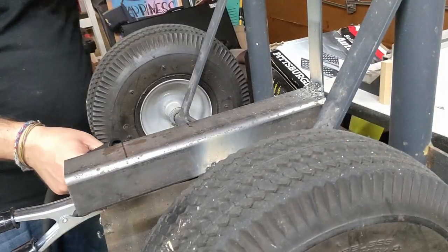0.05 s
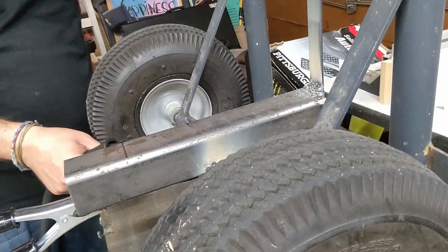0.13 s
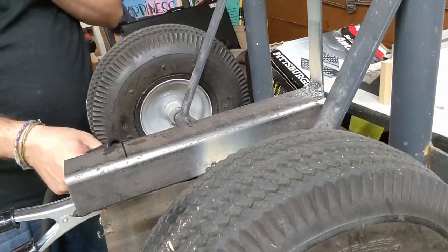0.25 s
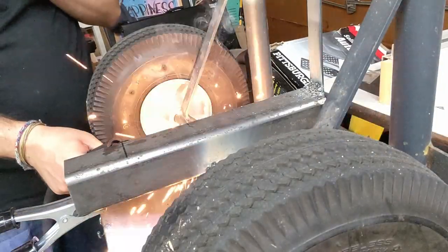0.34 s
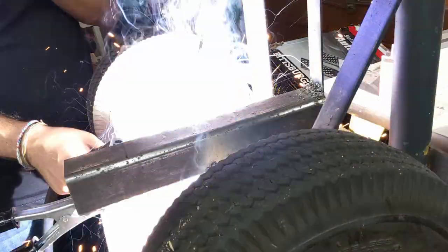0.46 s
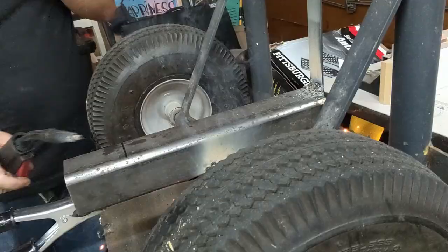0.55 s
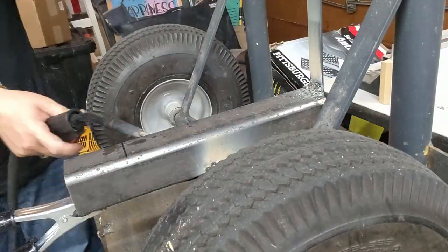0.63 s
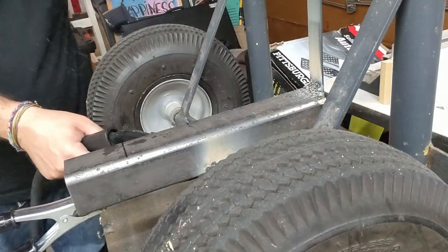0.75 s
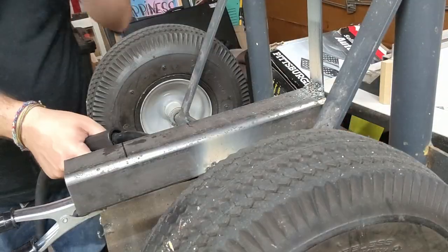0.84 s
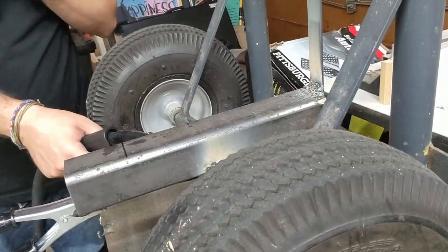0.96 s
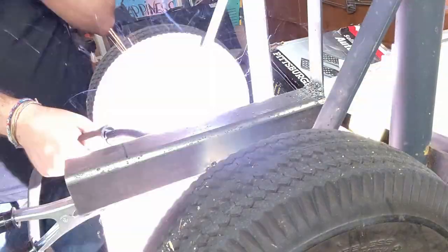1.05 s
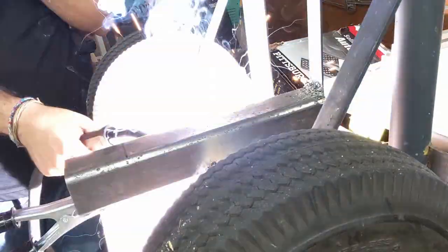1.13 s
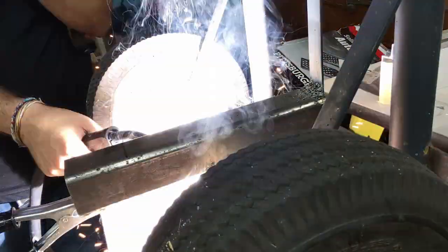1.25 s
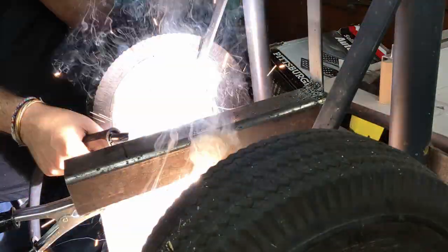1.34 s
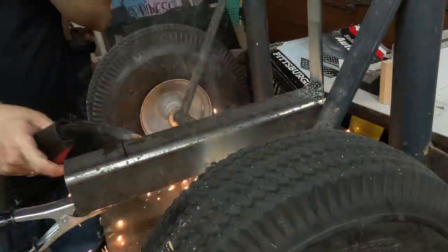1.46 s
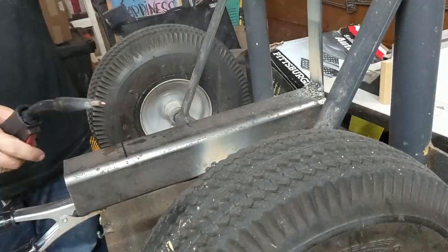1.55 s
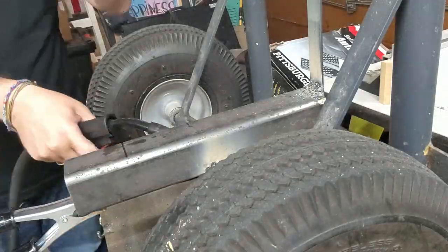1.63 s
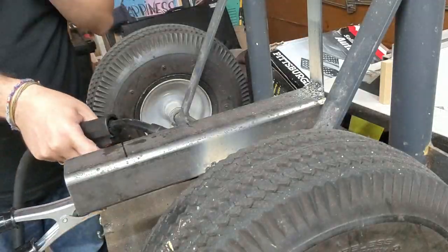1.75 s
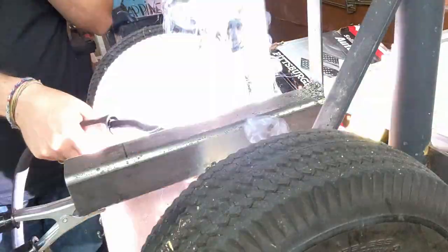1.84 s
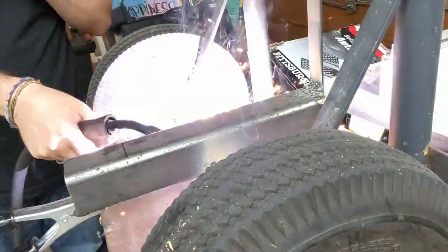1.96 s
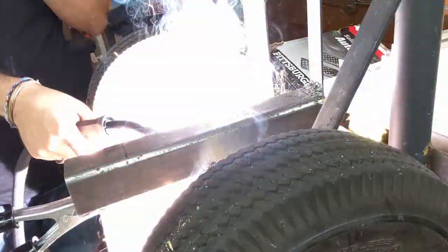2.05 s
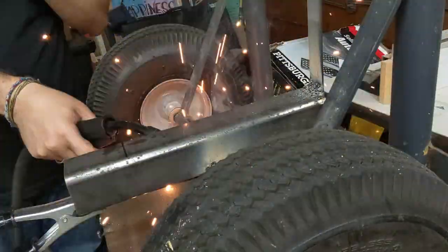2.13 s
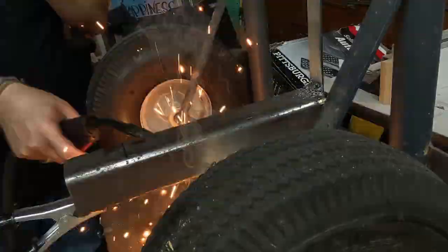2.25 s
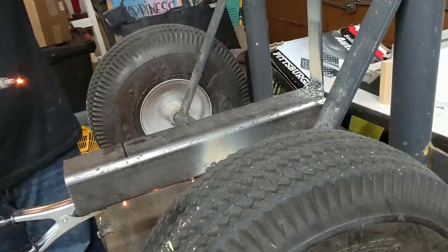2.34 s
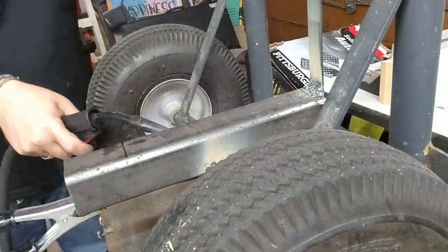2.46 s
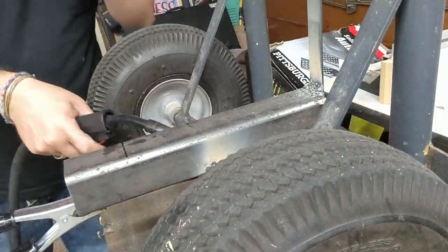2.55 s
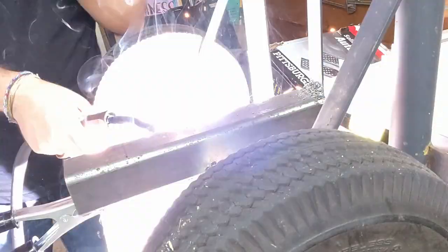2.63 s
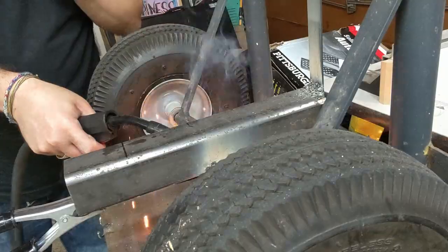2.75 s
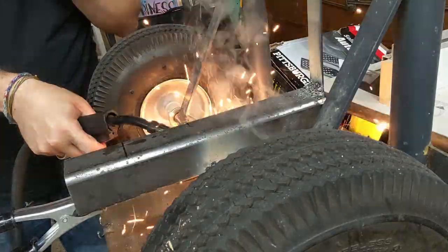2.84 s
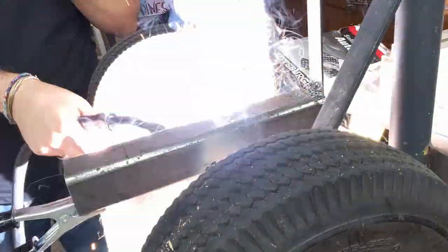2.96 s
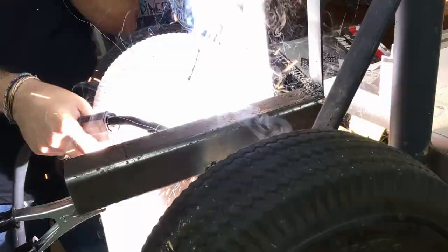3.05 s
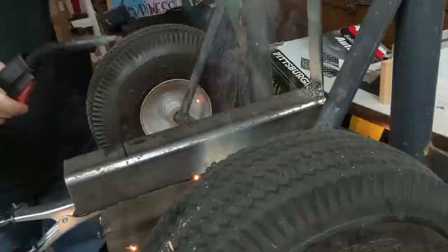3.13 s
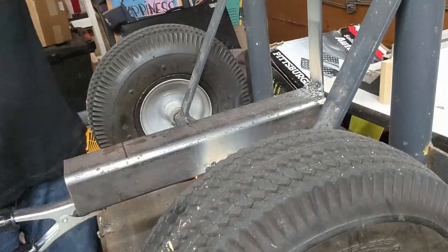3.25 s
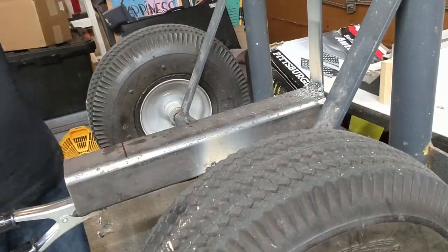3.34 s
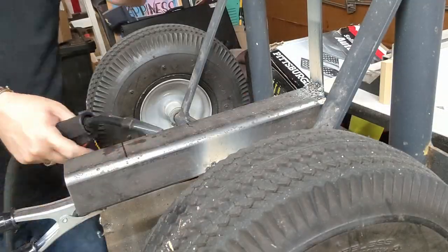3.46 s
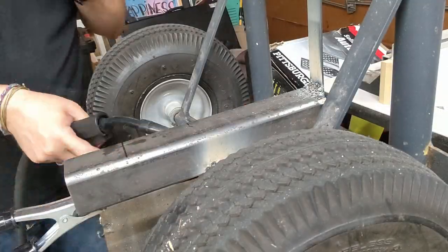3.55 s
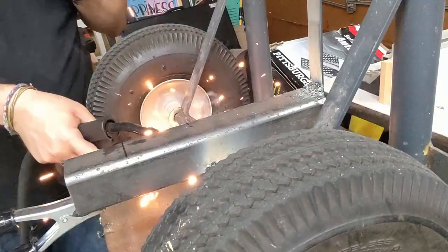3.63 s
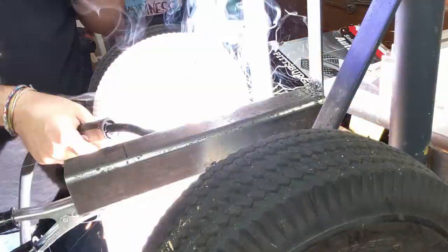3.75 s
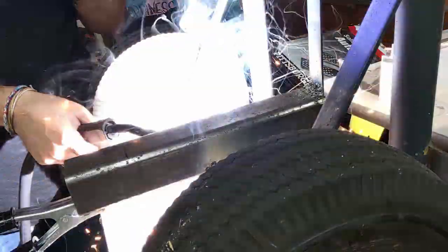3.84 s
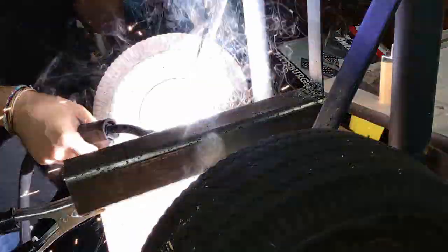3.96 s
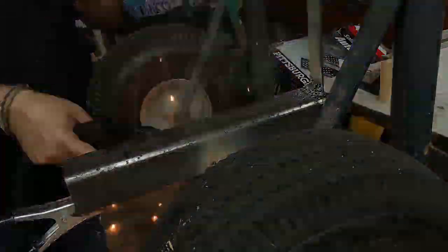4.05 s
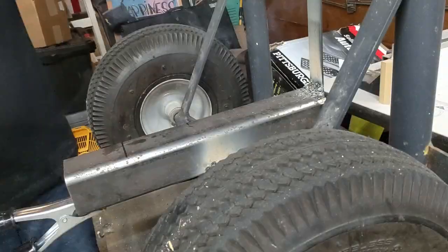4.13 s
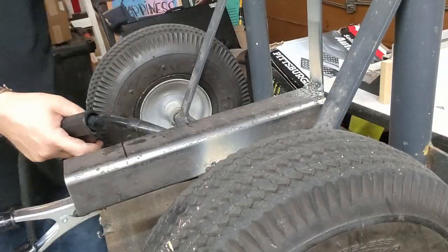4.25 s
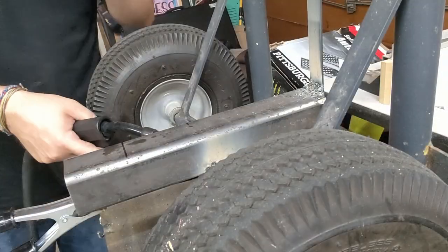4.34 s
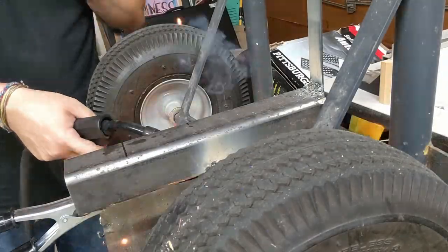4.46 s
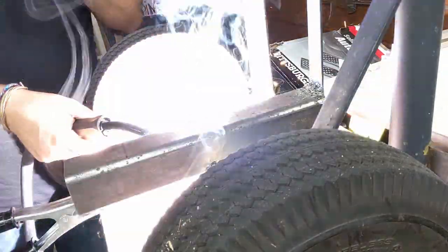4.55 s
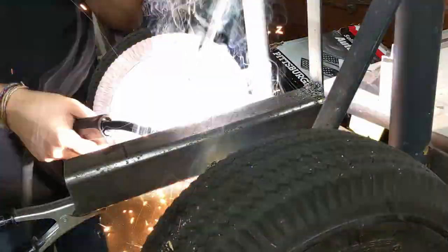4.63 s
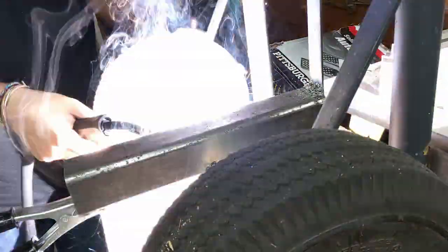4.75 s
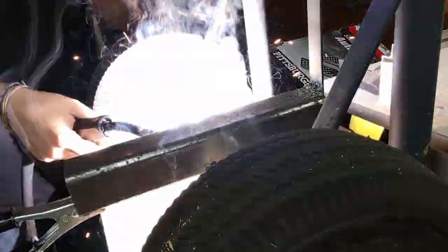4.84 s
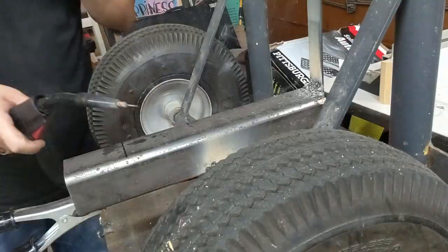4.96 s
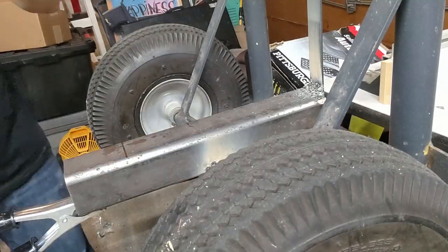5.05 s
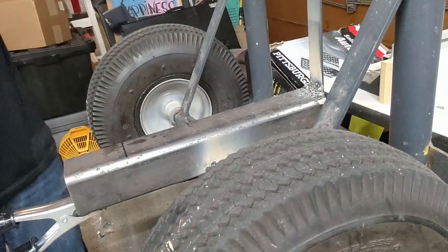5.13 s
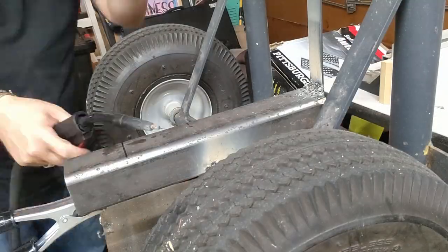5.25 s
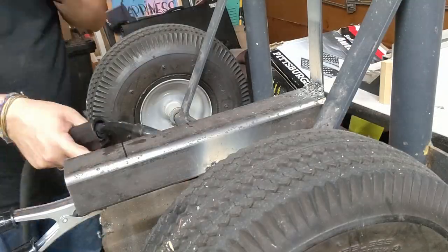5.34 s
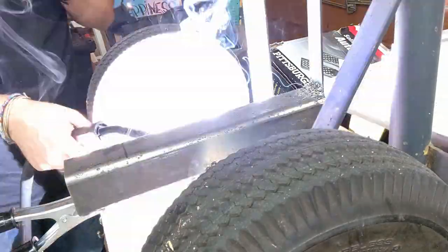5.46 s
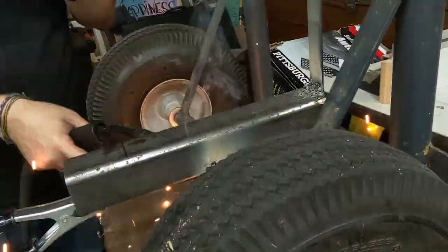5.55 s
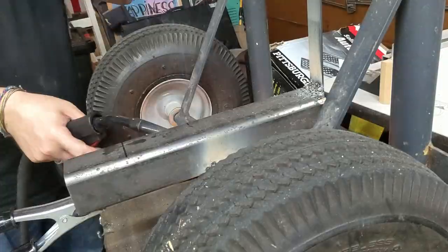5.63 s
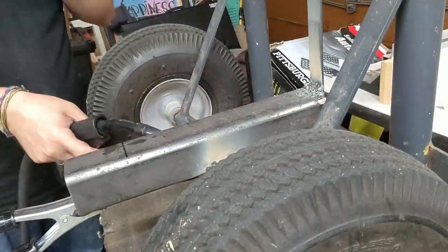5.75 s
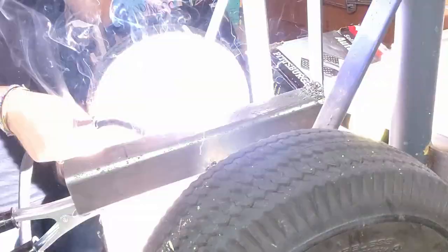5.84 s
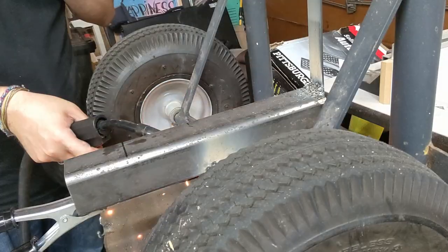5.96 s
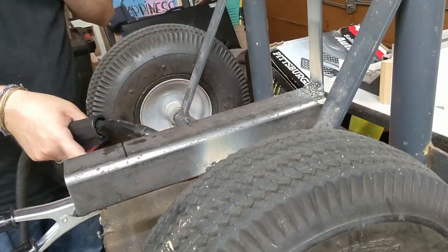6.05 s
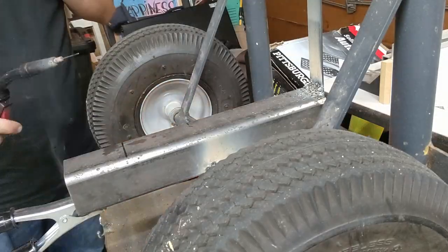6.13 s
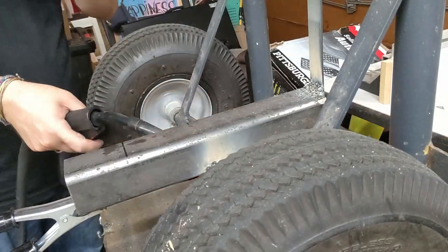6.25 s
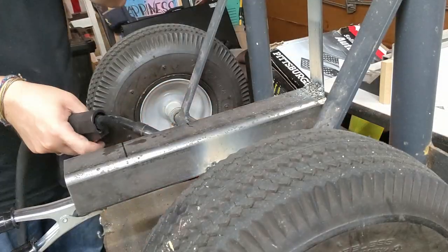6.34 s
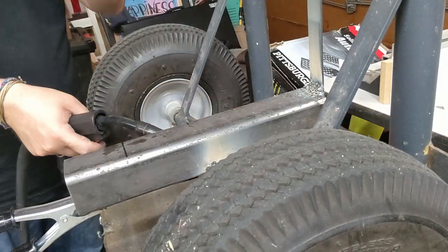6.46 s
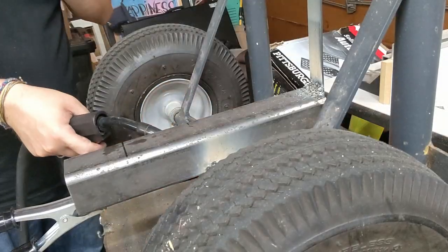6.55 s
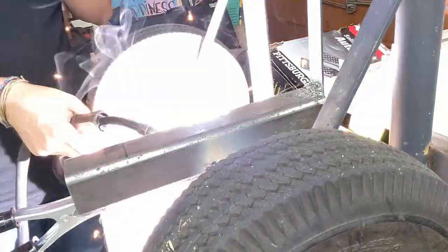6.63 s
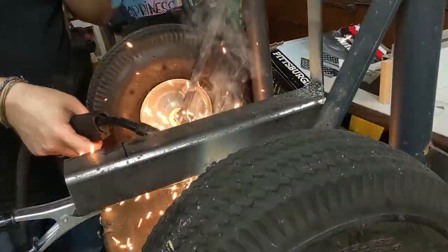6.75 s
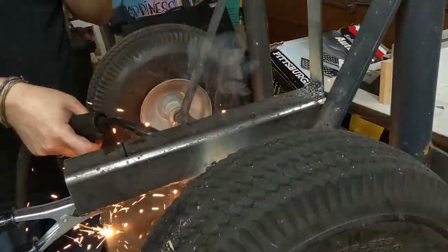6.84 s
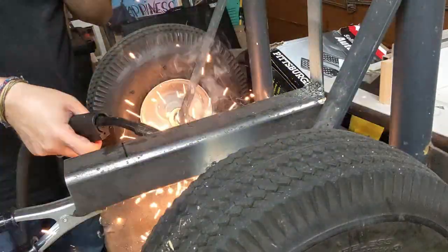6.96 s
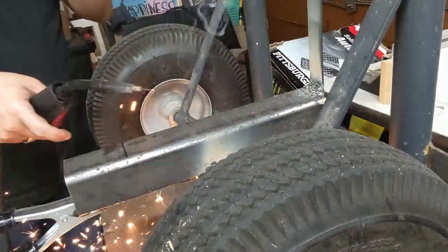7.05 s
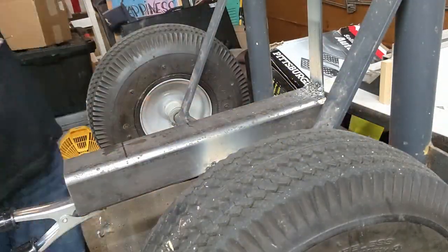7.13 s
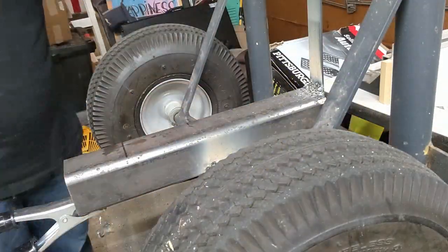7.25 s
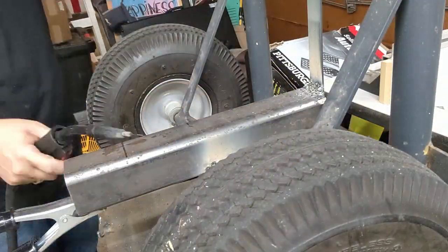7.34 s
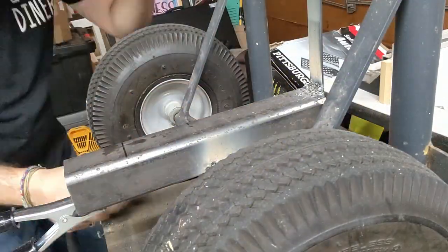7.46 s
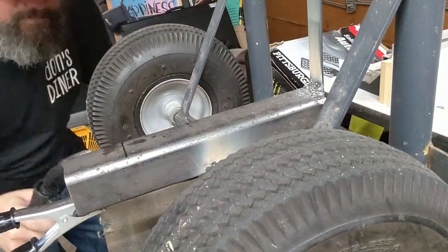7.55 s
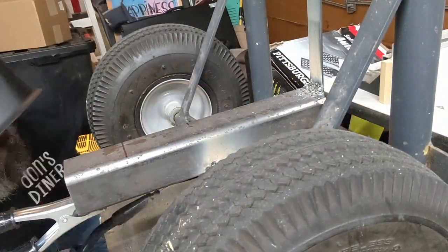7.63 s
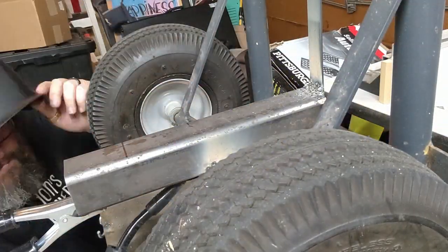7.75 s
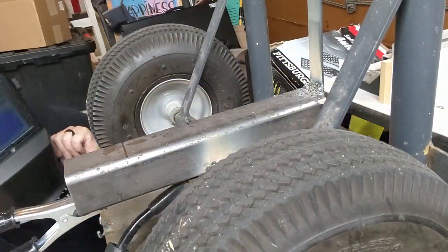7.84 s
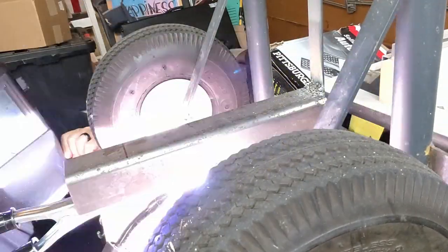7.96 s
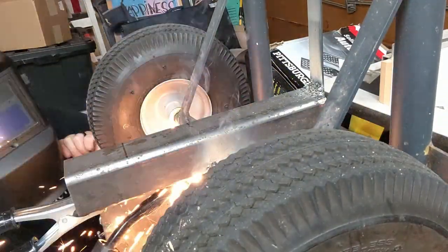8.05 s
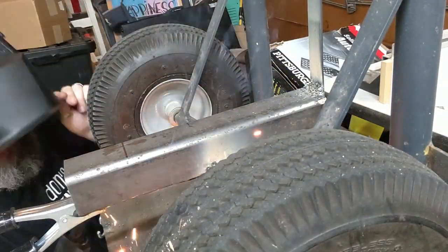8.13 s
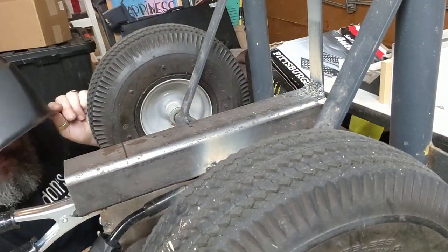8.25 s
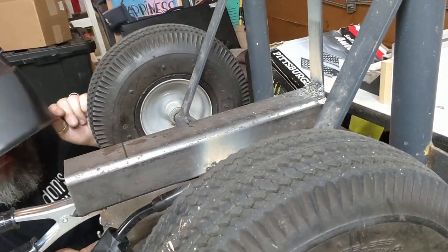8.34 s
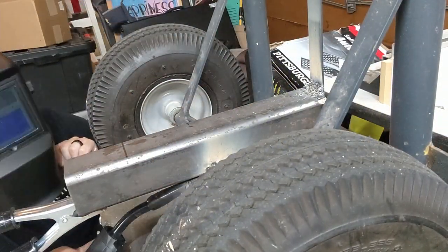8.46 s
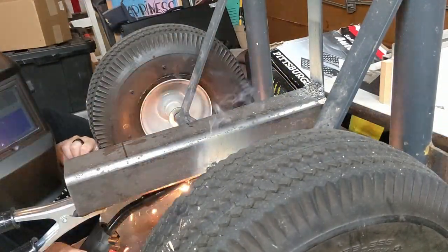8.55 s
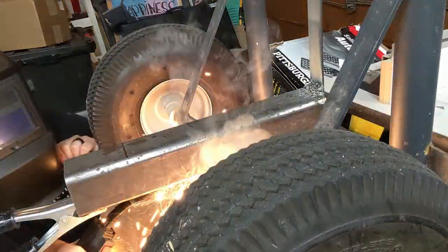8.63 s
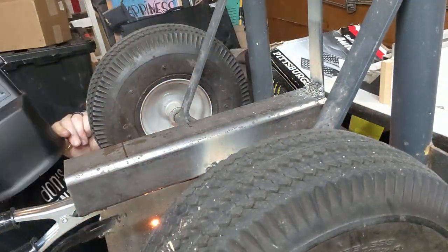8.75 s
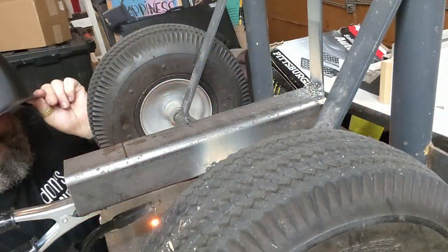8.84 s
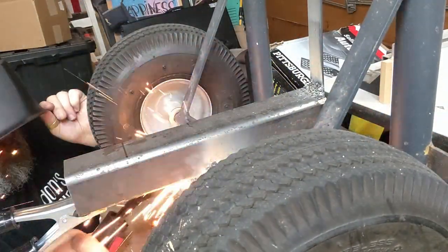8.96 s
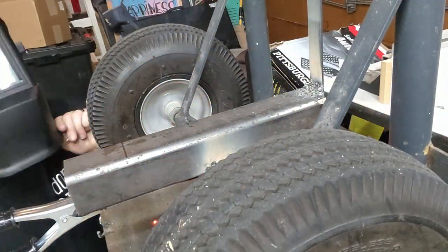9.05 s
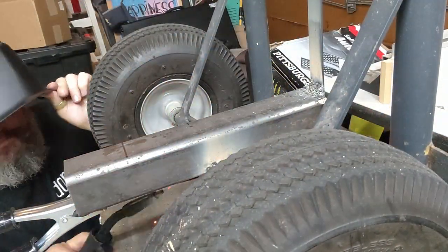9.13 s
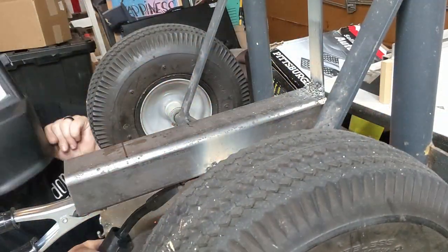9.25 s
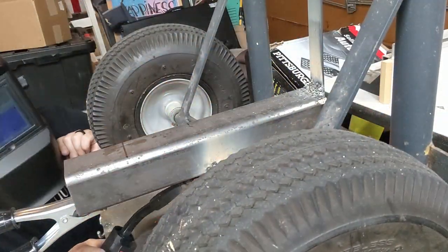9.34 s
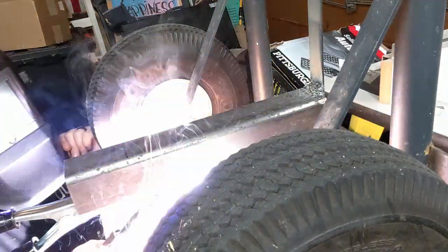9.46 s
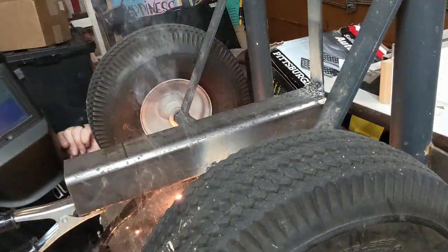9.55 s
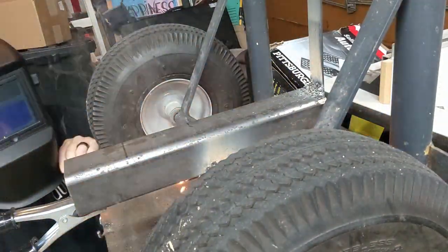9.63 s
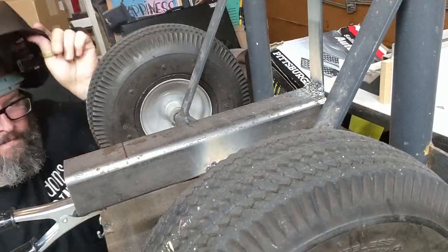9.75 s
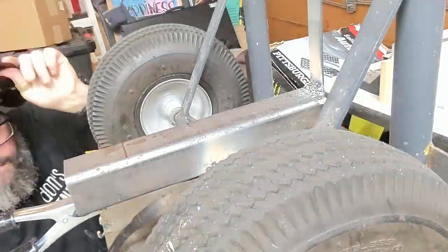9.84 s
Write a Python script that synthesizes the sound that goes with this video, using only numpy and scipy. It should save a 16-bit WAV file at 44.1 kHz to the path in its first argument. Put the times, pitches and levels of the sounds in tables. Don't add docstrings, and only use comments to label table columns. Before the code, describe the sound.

A welding arc spits harsh, crackling bursts on steel tubing in irregular fits, with sharp snaps and low puffs over a faint workshop fan.

```python
import sys
import numpy as np
from scipy import signal
from scipy.fft import rfft, irfft, next_fast_len
from scipy.io import wavfile
from scipy.ndimage import uniform_filter1d

SR = 44100
rng = np.random.default_rng(int(sys.argv[2]) if len(sys.argv) > 2 else 0)


def master(y):
    cut = np.clip(np.atleast_2d(y).T, -1, 1)
    pcm = np.round(cut * 32767)
    wavfile.write(sys.argv[1], SR, pcm.astype(np.int16))


def field_ratio(decibels):
    return 10 ** (np.asarray(decibels, dtype=float) / 20)


N = 436590

# [t/s, fizz level/dB, length/ms, tube re fizz/dB]
STRIKES = [(0.384, -30, 68, -3), (0.43, -23, 4, -18.5), (1.124, -27, 13, -1), (1.822, -43, 100, 4),
           (1.907, -22, 30, -4), (2.019, -23.5, 19, -4), (2.169, -22, 24.3, -6.5), (2.217, -26, 107, -2.5),
           (2.868, -26, 33, 2.5), (3.882, -28, 5.3, -10), (3.933, -22, 11, -20.5), (4.008, -21.5, 9.1, -5),
           (4.654, -23, 25, -6), (4.838, -33, 5.4, -2), (4.885, -29.5, 31.6, 1), (5.452, -33.5, 24, 3.5),
           (5.528, -27, 69, -3), (6.664, -36.5, 85, -0.5), (6.671, -23.5, 36.6, -4.5),
           (6.73, -33, 10, -15.5), (6.755, -31.5, 56, 1.5), (6.781, -28, 41.5, 3), (6.945, -31, 18, -4),
           (7.045, -27, 19.4, -21.5), (7.999, -40, 133, 2), (8.012, -30.5, 23, -1.5),
           (8.535, -36.5, 28, -1.5), (8.569, -30, 26.5, -6), (8.661, -28, 40, 0), (9.512, -24.5, 15, -15)]
# [end t/s, fizz level/dB, length/ms, tube re fizz/dB]
BUILDS = [(0.5, -26, 50, -1.5), (1.135, -37, 61, -2.5), (1.177, -25.5, 20, -4.5), (1.251, -23.5, 12, -3),
          (1.405, -24.5, 22, -12.5), (1.44, -20.5, 8.3, -15), (1.473, -26, 15.5, -7.5),
          (1.502, -22.5, 9.6, -11), (2.294, -29, 11, 1), (2.7, -28, 22, 0), (2.899, -36, 120, 5),
          (2.936, -23.5, 18, -4.5), (2.974, -23.5, 12, -2), (2.977, -29, 71, -3), (3.031, -22.5, 19, -2.5),
          (3.148, -23.5, 104, -2), (3.718, -25.5, 21, -5), (3.752, -23.5, 15, -19), (3.769, -25, 66, -4.5),
          (3.816, -25, 31, -4), (3.889, -25, 107, -4.5), (3.906, -25.5, 4.8, 3), (4.084, -23, 107, -4),
          (4.489, -25.5, 5.8, -1), (4.554, -23.5, 20, -2.5), (4.607, -23.5, 28, -6),
          (5.912, -27.5, 23, -5.5), (6.88, -21.5, 21, -1.5), (8.688, -27, 39, -4.5), (9.43, -28.5, 9.8, 4)]
# [t/s, fizz level/dB, length/ms, tube re fizz/dB]
HOLDS = [(0.427, -29.5, 125, -3), (1.151, -36.5, 121, -7), (1.151, -30.5, 14, 0.5), (1.19, -23, 27, -2.5),
         (1.279, -31, 128, -9.5), (1.395, -39, 124, -13), (1.828, -24, 34, -5.5), (2.017, -36.5, 125, -0.5),
         (2.064, -24, 43, -4), (2.835, -25, 17.6, 0), (3.914, -25.5, 96, -2.5), (4.533, -32.5, 163.5, 1.5),
         (4.757, -27.5, 152, -3.5), (6.991, -36.5, 57, 2.5), (9.462, -37, 112, 4.5)]
# [t/s, fizz level/dB, length/ms, tube re fizz/dB]
MORE_HOLDS = [(4.092, -43.5, 8.5, -3), (1.897, -36, 7, -4), (2.158, -41, 7, -4), (3.679, -38, 14, -1),
              (5.515, -42, 9, -11), (4.5, -53, 14, 8), (4.71, -64, 33, 15), (5.485, -57, 40, 8),
              (6.895, -54, 45, 4), (8.617, -33.5, 17.4, 2), (9.03, -49.5, 13, -10)]
# [t/s, fizz level/dB, tube re fizz/dB]
SPITS = [(0.339, -23.5, -10), (0.534, -26, -15.5), (1.088, -28.5, 1.5), (1.244, -22.5, -3.5),
         (1.434, -42.5, -22), (1.495, -24, -6), (2.126, -25.5, -6), (2.22, -22, -19), (2.255, -31, 1),
         (2.279, -17.5, -17), (2.688, -24, -7), (2.79, -22.5, -1), (2.925, -25, -24.5), (3.097, -23, -4),
         (3.363, -34.5, -6), (3.798, -21, -10), (3.86, -28, -9), (4.777, -22, -3), (4.872, -25, -1.5),
         (5.454, -29, -1.5), (5.532, -25, -48), (6.946, -33, 0), (7.013, -24.5, 2), (8.025, -21, -1),
         (8.07, -22, -2), (9.021, -28.5, -9), (9.442, -44, 11), (9.467, -22.5, -2.5), (9.524, -22, -1),
         (9.552, -22.5, -19)]
# [t/s, level/dB]
EARLY_SNAPS = [(0.3403, -21), (0.4313, -33), (0.4623, -23), (0.491, -34), (0.497, -27), (0.507, -14),
               (0.5328, -15), (0.5425, -24.5), (1.0909, -11.5), (1.1324, -29), (1.179, -44), (1.1955, -31),
               (1.2128, -23), (1.2197, -24.5), (1.2454, -25), (1.254, -32), (1.2883, -35), (1.3095, -44),
               (1.3209, -35), (1.3943, -21), (1.477, -18), (1.8286, -18), (1.8344, -24), (1.8468, -13),
               (1.853, -33), (1.9139, -35), (2.0162, -15), (2.0209, -27), (2.0285, -15), (2.0683, -29),
               (2.078, -16), (2.0856, -15), (2.103, -29), (2.1264, -18.5), (2.171, -29), (2.1775, -26),
               (2.1906, -26), (2.2188, -35), (2.2237, -36), (2.2569, -24), (2.28, -28), (2.2836, -18),
               (2.6911, -19.5), (2.79, -12), (2.839, -16), (2.875, -34), (2.9287, -15), (2.9677, -31),
               (2.9758, -18), (3.0305, -34), (3.0563, -17), (3.083, -16), (3.1018, -12), (3.107, -13),
               (3.117, -14), (3.125, -13), (3.131, -22), (3.1461, -38), (3.1505, -31), (3.7174, -25),
               (3.7428, -14.5), (3.7517, -25), (3.7702, -27), (3.8038, -21.5)]
LATE_SNAPS = [(3.816, -28.5), (3.8605, -12), (3.8803, -21.5), (3.907, -15), (3.9135, -15), (3.917, -19),
              (3.935, -27), (3.9404, -24), (3.9507, -34), (3.9654, -27), (3.989, -21), (4.01, -20),
              (4.0183, -23), (4.0363, -18), (4.063, -15), (4.0687, -24), (4.0783, -25.5), (4.0862, -29),
              (4.485, -34), (4.4917, -22.5), (4.543, -16), (4.555, -36), (4.559, -28), (4.5776, -34),
              (4.5928, -24), (4.612, -20), (4.629, -23), (4.6576, -24), (4.672, -14), (4.6817, -15),
              (4.7786, -31.5), (4.818, -27), (4.834, -20), (4.8438, -17), (4.8704, -19), (4.8938, -19),
              (5.454, -32), (5.5323, -32), (5.5427, -33), (5.5787, -39), (5.909, -12), (6.6745, -35),
              (6.6968, -14), (6.729, -28), (6.7375, -34), (6.7787, -37), (6.8058, -23), (6.8769, -23),
              (6.9482, -19), (7.016, -30), (8.0263, -14), (8.0684, -15), (8.571, -23.5), (9.0212, -26),
              (9.4198, -36), (9.426, -20), (9.4443, -20), (9.4647, -25), (9.478, -17), (9.484, -26),
              (9.529, -23), (9.55, -29)]
# [t/s, fizz level/dB]
SPATTER = [(4.145, -51), (4.219, -53), (5.037, -42.5), (5.054, -44.5), (5.125, -48.5), (5.198, -49.5),
           (5.329, -41), (7.086, -50), (7.101, -42.5), (7.274, -49.5), (7.356, -49), (7.624, -39.5),
           (7.631, -42), (7.648, -47), (7.782, -52.5), (8.422, -52), (9.016, -33.5), (9.187, -66)]
# [10 dB rise/ms, 10 dB fall/ms, crack size/1]
STRIKE_EDGE = (3.2, 8.5, .1)
BUILD_EDGE = (5, 6.5, .1)
HOLD_EDGE = (4, 7, .1)
SPIT_EDGE = (3.6, 10.7, 0.082)
SPATTER_EDGE = (6.1, 11, 0.36)
SNAP_EDGE = (.6, 2.2, .48)
# [f/Hz, density level/dB]
FIZZ = [(1410, -18.5), (2400, -11.5), (2740, -14), (3470, -0.5), (4710, -3), (5250, -2), (7070, -6),
        (12300, 0.5), (14400, -5.5)]
LOW_FIZZ = [(1410, -14), (2400, -19), (5000, -9), (8400, -9.5), (11900, -1), (15600, -11)]
TUBE = [(150, -14.5), (250, -4), (636, -7), (830, -17.5), (1080, -8), (1200, -12), (1550, -4), (1770, -3),
        (1960, -6), (2410, -9), (2900, -11.5), (3770, -16.5), (6380, -120)]
# [f/Hz, width/Hz, level above
# spectrum/dB]
RINGS = [(1100, 120, 4), (1594, 50, 6), (1814, 100, 5), (2160, 80, 4.5), (2440, 70, 6), (3027, 60, 4),
         (3600, 300, -6), (4010, 150, -4), (4750, 500, 5), (5400, 200, -4), (11800, 200, 3),
         (12520, 170, 5), (13970, 250, 5), (14650, 300, 5)]
LOW_RINGS = [(3500, 920, 10), (4200, 250, 5.5), (5600, 1100, 5.5), (7400, 520, 5), (12550, 400, -7)]
# [f/Hz, phase/rad]
ARC_SAME = [(180, 0.98), (500, 0.99), (1000, 0.66), (1250, 0.25), (1600, 0.68), (2300, .66), (2750, 0.12),
            (3900, 0.11), (4600, 0.49), (5400, 0.13), (8300, 0.16), (10100, 0.096), (11000, 0.42),
            (13300, 0.2)]
ARC_PAN = [(150, 1.5), (700, 0.5), (1030, 6), (1370, -5.5), (2450, 6), (3000, 1.5), (4100, 1.5), (4650, 7),
           (5300, -1.5), (6550, 8.5), (7100, 3), (9100, 3), (11500, 0.5), (12500, -1.5), (13200, -4)]
ARC_LEAD = [(60, -0.5), (1000, 0.96), (1250, -3.5), (1600, 1.13), (4600, -0.56), (5300, 2.05), (8300, 0.2),
            (9000, 4.5), (11500, 4), (12500, 4.5), (15500, 9)]
# [t/s, level/dB, f/Hz]
PUFFS = [(0.432, -38, 137), (0.535, -33, 143), (1.171, -33, 158), (1.205, -33.5, 162), (1.263, -29, 100),
         (1.501, -45, 157), (1.859, -32.5, 195), (2.036, -40, 186), (2.183, -42, 220), (2.792, -39, 238),
         (2.918, -31.5, 119), (3.854, -32.5, 129), (3.96, -24.5, 162), (4.02, -20.5, 124),
         (4.486, -38, 330), (4.573, -34, 120), (4.78, -30.5, 121), (4.827, -30, 174), (4.897, -33.5, 169),
         (5.555, -23.5, 115), (6.944, -52, 219), (7.707, -53, 150), (7.722, -44, 131), (7.742, -49, 160),
         (8.016, -31.5, 166), (8.068, -49, 224), (8.112, -45, 153), (8.574, -30, 121), (8.633, -27, 146),
         (9.028, -25.5, 127), (9.427, -31, 169), (9.47, -33, 229)]
# [middle t/s, level/dB]
FLUTTERS = [(0.404, -43.5), (0.502, -35), (1.098, -41.5), (1.396, -48), (1.923, -42.5), (2.094, -39),
            (2.239, -39), (2.297, -42.5), (2.69, -50), (2.854, -36), (3.024, -42.5), (3.096, -39.5),
            (3.72, -41.5), (3.803, -40), (3.898, -38.5), (4.075, -40), (4.556, -37), (4.656, -33),
            (4.835, -33), (5.462, -47), (5.901, -48.5), (6.685, -46), (6.779, -46.5), (6.871, -55),
            (7.011, -42.5), (7.721, -59), (8.677, -38), (9.515, -44.5)]
# [t/s, level/dB, rise/ms, fall/ms, f/Hz]
KNOCK = [
    (7.631, -38, 6, 8, 2196),
    (7.706, -38, 1.5, 9, 340),
    (7.732, -41, 3, 6, 280),
    (7.745, -39, 1.5, 4, 320),
    (8.026, -24, 1, 3, 1950),
    (8.07, -30, 1, 5, 4200),
    (8.071, -29, 2, 5, 330),
    (8.111, -28, 1, 2.6, 960),
    (9.022, -35, 2.6, 3.1, 458),
    (9.444, -33, 1, 3, 1800),
]
# [t/s, level/dB, rise/ms, fall/ms]
SIZZLE = [
    (.807, -47, 4.9, 3),
    (4.121, -50, 2, 5),
    (5.96, -54, 44, 38),
    (7.17, -51, 8.6, 8.2),
    (7.603, -47, 2, 6.5),
    (7.861, -45, 3, 2),
    (7.909, -49, 4, 1.8),
    (9.642, -58, 42, 92),
]
# [t/s, level/dB]
TICKS = [(.736, -80), (2.602, -66), (3.19, -58), (3.241, -59), (3.285, -61), (3.409, -61), (3.452, -56),
         (3.562, -55), (4.277, -67), (4.37, -74), (6.0, -63), (6.04, -66), (7.135, -60), (7.325, -62),
         (7.549, -65), (7.712, -58), (7.805, -58), (7.959, -66), (8.194, -64), (8.457, -62), (8.839, -62),
         (8.944, -67), (9.083, -70), (9.1, -72), (9.13, -72), (9.149, -75), (9.625, -59), (9.67, -59)]
# [f/Hz, density level/dB]
BEAD = [(3000, -9), (8000, -9.5), (12000, -4.5), (15600, -11)]
# [f/Hz, density level/dB]
AIR = [(15, -44), (25, -19), (55, -14.5), (250, -9.5), (390, -6), (850, -13.5), (1050, -10), (1480, -18),
       (1720, -12), (2050, -19), (5000, -27), (8000, -34), (11000, -34.5), (15600, -41)]
# [f/Hz, phase/rad]
AIR_SAME = [(60, 0.74), (180, 0.9), (550, 0.92), (1650, 0.22), (4970, 0.42), (15000, -0.22)]
AIR_PAN = [(60, -2.5), (180, 2.5), (550, -1), (1650, 2.5), (4970, 3.5), (15000, -3)]
AIR_LEAD = [(550, 0), (1650, 3), (4970, 5.5), (15000, 0)]
# [f/Hz, level/dB]
FAN = [(116, -64), (281, -61), (398, -67), (587, -64), (1599, -67), (1671, -55), (1884, -69), (2252, -65)]
# [t/s, level/dB]
FEED = [(0.55, -58), (.75, -63), (.95, -56), (1.08, -47), (1.2, -73), (1.55, -64), (1.62, -55), (1.8, -62),
        (1.9, -68)]
# [t/s, level/dB]
SHADE = [
    (0, -0.5),
    (.6, 0),
    (5.5, 0.5),
    (7.4, -1.5),
    (8.7, -4),
    (9.9, -1),
]
# [t/s, depth/dB, recovery/(dB/s)]
DUCKS = [
    (1.51, 7, 47),
    (3.38, 2, 29),
    (8.12, 9.5, 53),
    (9.04, 14, 46.5),
]


def read(points, hz):
    f, value = np.transpose(points)
    return np.interp(np.log(hz + 1), np.log(f + 1), value)


def evened(x):
    return x / np.sqrt(np.mean(x ** 2) + 1e-20)


def drift(per_s, count):
    knot_rate = 400
    knots = rng.standard_normal((int(N / SR * knot_rate) + 2, count)).T
    knots = uniform_filter1d(knots, max(1, int(knot_rate / per_s)), axis=1)
    t = np.linspace(0, knots.shape[1] - 1, N)
    return np.array([evened(np.interp(t, np.arange(len(k)), k)) for k in knots])


def swell(s, db, rise_ms, fall_ms, bend=1):
    rise_ms, fall_ms = max(rise_ms, 1.), max(fall_ms, 1.)
    start = max(0, int(s * SR - 6 * rise_ms * SR / 1000))
    stop = min(N, int(s * SR + 6 * fall_ms * SR / 1000))
    ms = (np.arange(start, stop) / SR - s) * 1000
    away = np.where(ms < 0, -ms / rise_ms, ms / fall_ms)
    return slice(start, start + len(ms)), field_ratio(db - 10 * away ** bend), ms


def causal(db):
    log_gain = np.log(field_ratio(np.maximum(db, -100)))
    full = np.concatenate([log_gain, log_gain[-2:0:-1]])
    return np.exp(log_gain - 1j * signal.hilbert(full).imag[:len(db)])


def ports(drive, db, same, pan, lead, alike):
    size = 2 * next_fast_len(N // 2 + 4096)
    hz = np.fft.rfftfreq(size, 1 / SR)
    gain = causal(db(hz))
    gain = gain / np.sqrt(np.mean(abs(gain) ** 2))
    direct, twin = rfft(drive, size) * gain
    share = abs(read(same, hz))
    alike = np.clip(np.maximum(alike, share), .01, 1)
    bounce_s = 0.0011
    bounce = 2.2 * np.sqrt(1 - share / alike) * np.sin(2 * np.pi * hz * bounce_s)
    right = alike * np.exp(1j * (read(lead, hz) + bounce)) * direct
    right = right + np.sqrt(1 - alike ** 2) * twin
    tilt = field_ratio(read(pan, hz) / 2)
    return irfft(np.array([direct * tilt, right / tilt]), size)[:, :N]


def ringing(spectrum, rings):
    def db(hz):
        peaks = sum(db / (1 + (2 * (hz - f) / width) ** 2) for f, width, db in rings)
        return read(spectrum, hz) + peaks
    return db


def flare(s, db, length_ms, slope_db, edge):
    at = slice(int((s - .05) * SR), int((s + length_ms / 1000 + .06) * SR))
    ms = (np.arange(at.start, at.stop) / SR - s) * 1000
    rise, fall = np.clip([-ms / edge[0], (ms - length_ms) / edge[1]], 0, None) ** 1.4
    body = slope_db * np.clip(ms / max(length_ms, 1), 0, 1)
    return at, field_ratio(db + body - 10 * (rise + fall))


def burns():
    sag_db = 8
    snap_db, snap_ring_db, spatter_ring_db = -11, -2, -3
    rows = []

    def burn(crack_s, ring_db, edge, s, db, length_ms=0, slope_db=0):
        rows.append((crack_s, edge[2], ring_db, *flare(s, db, length_ms, slope_db, edge)))

    for s, db, ms, ring_db in STRIKES:
        burn(s, ring_db, STRIKE_EDGE, s, db, ms, -sag_db)
    for s, db, ms, ring_db in BUILDS:
        burn(s, ring_db, BUILD_EDGE, s - ms / 1000, db - sag_db, ms, sag_db)
    for s, db, ms, ring_db in HOLDS + MORE_HOLDS:
        burn(s, ring_db, HOLD_EDGE, s, db, ms)
    for s, db, ring_db in SPITS:
        burn(s, ring_db, SPIT_EDGE, s, db)
    for s, db in EARLY_SNAPS + LATE_SNAPS:
        burn(s, snap_ring_db, SNAP_EDGE, s, db + snap_db)
    for s, db in SPATTER:
        burn(s, spatter_ring_db, SPATTER_EDGE, s, db)
    return rows


def shifting(x):
    z = signal.stft(x, nperseg=256)[2]
    patches = rng.standard_normal(z.shape[1:][::-1]).T
    patches = uniform_filter1d(patches, size=2, axis=0)
    patches = evened(uniform_filter1d(patches, size=10, axis=1))
    return signal.istft(z * field_ratio(2 * patches), nperseg=256)[1][:, :N]


def arc():
    fizz_power, tube_power, cracks = np.zeros((3, N))
    for s, crack, ring_db, at, level in burns():
        fizz_power[at] += level ** 2
        tube_power[at] += (level * field_ratio(ring_db)) ** 2
        cracks[int(s * SR)] = crack
    spark_size = field_ratio(2.7 * np.minimum(rng.exponential(1, N), 3))
    snaps = spark_size * (rng.random(N) < 300 / SR) + 6 * cracks
    hiss = signal.lfilter([1], [1, -np.exp(-1 / (.0013 * SR))], snaps)
    ripple_hz = 117 + 3 * drift(11.2, count=1)[0]
    ripple = np.sin(2 * np.pi * np.cumsum(ripple_hz) / SR)
    noise = rng.standard_normal((N, 2)).T * (1 + 0.36 * hiss) * field_ratio(0.8 * ripple)
    drive = evened(noise - 1.8 * snaps)
    sputter = field_ratio(0.92 * drift(150, count=2))
    sparks = drive * sputter[0] * np.sqrt(fizz_power)
    tube_drive = drive * sputter[1] * np.sqrt(tube_power)
    low_seam = np.arange(N) > 7.5 * SR
    paths = ARC_SAME, ARC_PAN, ARC_LEAD
    out = field_ratio(0.83) * ports(sparks * ~low_seam, ringing(FIZZ, RINGS), *paths, 0.5)
    out += field_ratio(0.73) * ports(sparks * low_seam, ringing(LOW_FIZZ, LOW_RINGS), *paths, 0.5)
    out += field_ratio(-2.13) * ports(tube_drive, ringing(TUBE, RINGS), *paths, 0.8)
    hum = ripple * np.sqrt(uniform_filter1d(tube_power, size=900).clip(0))
    return shifting(out) + field_ratio([[-14], [-18]]) * hum


def pool():
    out, wander = np.zeros((2, N)), drift(60, count=2)
    band = signal.butter(2, [48, 400], "bandpass", fs=SR, output="sos")
    flutter = evened(signal.sosfilt(band, rng.standard_normal((N, 2)).T))
    flutter[1] = .6 * flutter[0] + .8 * flutter[1]
    thuds = [(s, db, 5.3, 4.7, hz) for s, db, hz in PUFFS]
    thuds += [(s, db, 24.1, 24.1, 176.2) for s, db in FLUTTERS]
    for s, db, rise_ms, fall_ms, hz in thuds:
        at, level, ms = swell(s, db, rise_ms, fall_ms, bend=1.08)
        pan_db = max(0.053 * (250 - hz), 0)
        pitch = hz * np.exp(-.12 * np.tanh(ms / 12) + 0.12 * wander[0, at])
        turns = np.cumsum(pitch) / SR
        turns += .97 - turns[np.argmax(level)]
        lag = 0.043 * pan_db * (.7 + .5 * rng.random() + .15 * wander[1, at])
        clean = np.exp(-((rise_ms + fall_ms) / 45) ** 2)
        push = np.sqrt(2 * clean) * np.sin(2 * np.pi * np.array([turns, turns - lag]))
        gas = push + np.sqrt(1 - clean) * flutter[:, at]
        out[:, at] += level * gas * field_ratio([[pan_db / 2], [-pan_db / 2]])
    return field_ratio(7.0) * out


def knock():
    out = np.zeros(N)
    for *shape, hz in KNOCK:
        at, level, ms = swell(*shape)
        out[at] += level * np.sin(2 * np.pi * hz * ms / 1000)
    return out


def bead():
    power = np.zeros(N)
    flakes = [(s, db + 6.5, 10, 11) for s, db in TICKS]
    for row in SIZZLE + flakes:
        at, level, _ = swell(*row)
        power[at] += level ** 2
    hiss = rng.standard_normal((N, 2)).T * np.sqrt(power)
    return ports(hiss, ringing(BEAD, []), ARC_SAME, ARC_PAN, ARC_LEAD, 0.8)


def tone(hz, width, lead):
    waver = drift(13.8, count=2)
    angle = 2 * np.pi * np.cumsum(hz + width * waver[0]) / SR
    return np.sqrt(2) * field_ratio(1.8 * waver[1]) * np.sin([angle + lead, angle])


def workshop():
    t = np.arange(N) / SR
    noise = rng.standard_normal((N, 2)).T * field_ratio(drift(25, count=1))
    air = ringing(AIR, [(13950, 500, 5.2)])
    wash = field_ratio(-48.33) * ports(noise, air, AIR_SAME, AIR_PAN, AIR_LEAD, 0.23)
    fan = sum(field_ratio(db) * tone(hz, hz / 1000, min(hz / 750, 1.6)) for hz, db in FAN)
    shade = field_ratio(np.interp(t, *np.transpose(SHADE)))
    feed = field_ratio(np.interp(t, *np.transpose(FEED), -99, -99)) * tone(100, 5.2, 0.1)
    return wash + fan * shade + feed


def scene():
    t = np.arange(N) / SR
    dip_db = sum(np.clip(db - rate * (t - s), 0, db) * (t > s) for s, db, rate in DUCKS)
    background = workshop() / field_ratio(uniform_filter1d(dip_db, size=600))
    return arc() + pool() + knock() + bead() + background


def low_pass(x):
    return signal.sosfilt(signal.butter(12, 16800, fs=SR, output="sos"), x)


def record(dry):
    soft = 1.3 * np.tanh(dry / 1.3)
    lowpass = signal.firwin(301, 15760, window=("kaiser", 6), fs=SR)
    edge = field_ratio(-44) * signal.unit_impulse(301, "mid") + lowpass
    return low_pass(signal.oaconvolve(soft, edge[None], "same"))


dry = scene()
out = record(dry)
master(out)
```